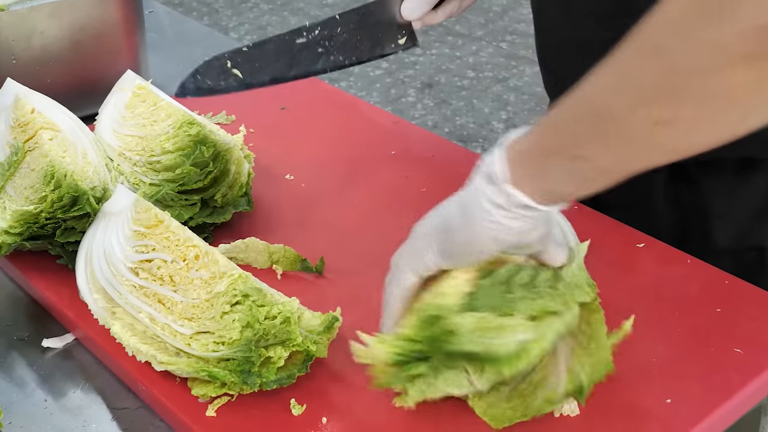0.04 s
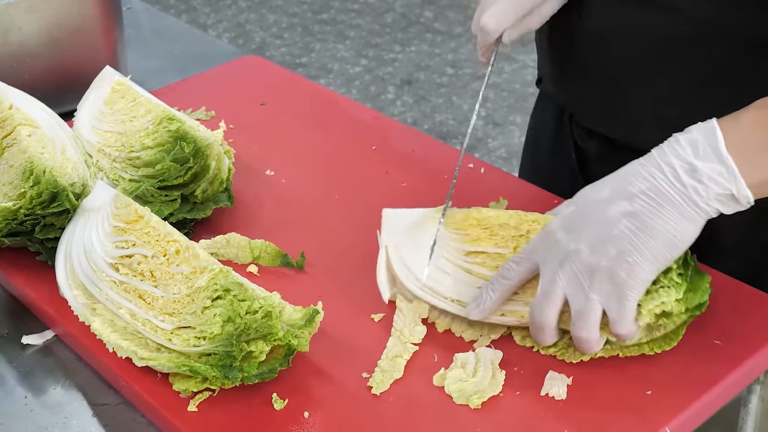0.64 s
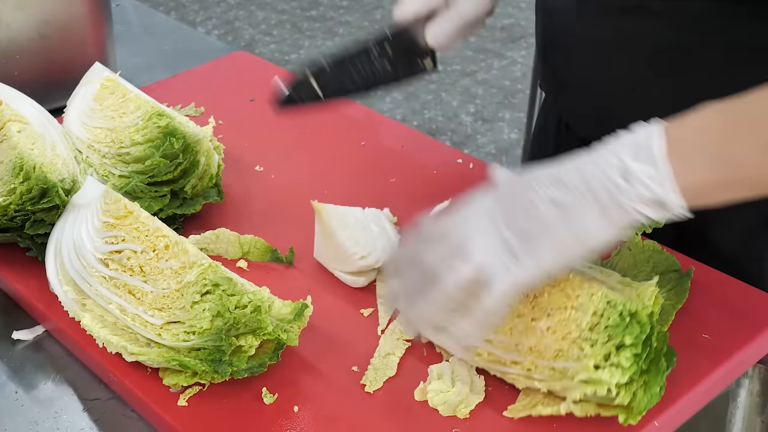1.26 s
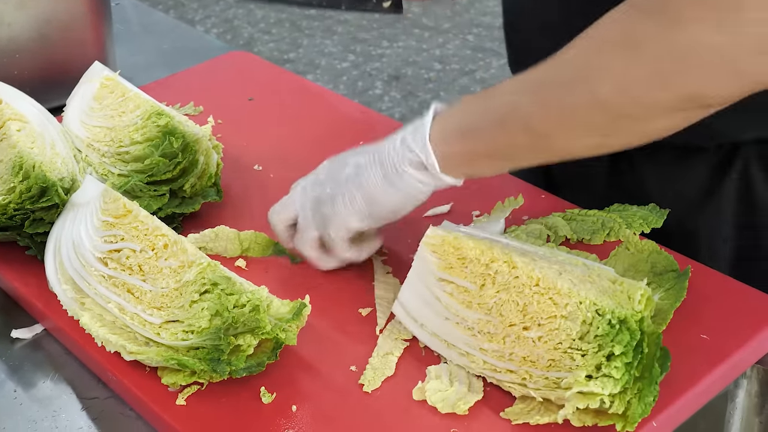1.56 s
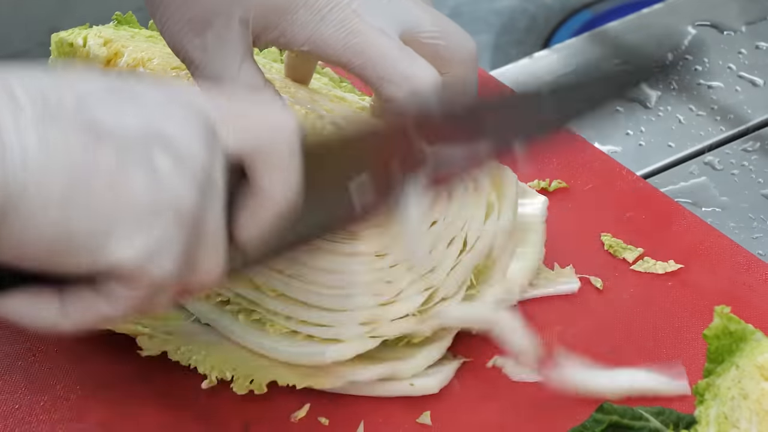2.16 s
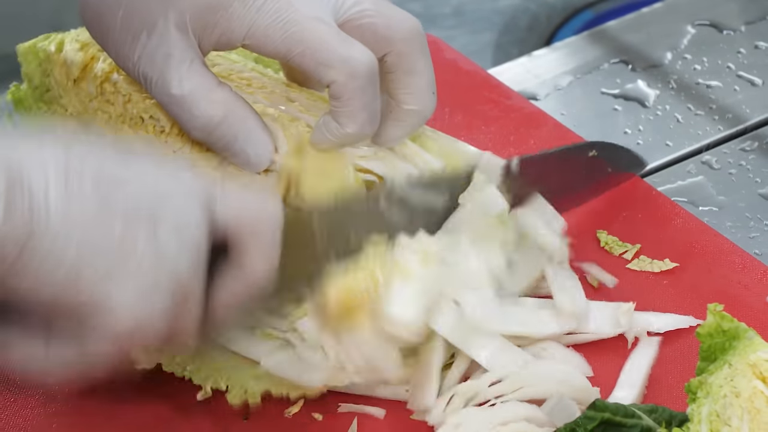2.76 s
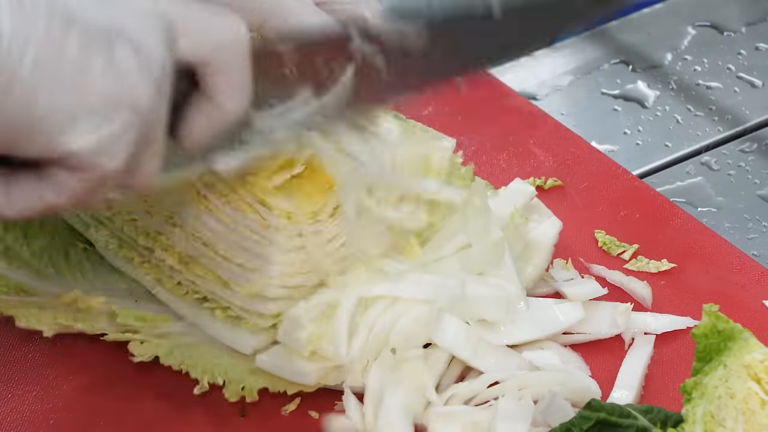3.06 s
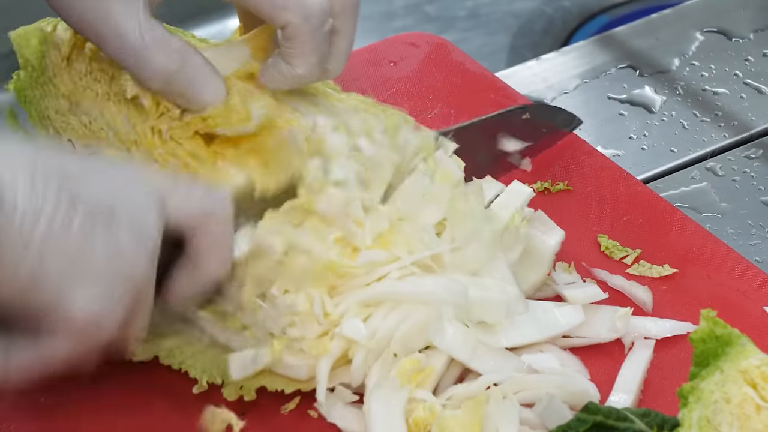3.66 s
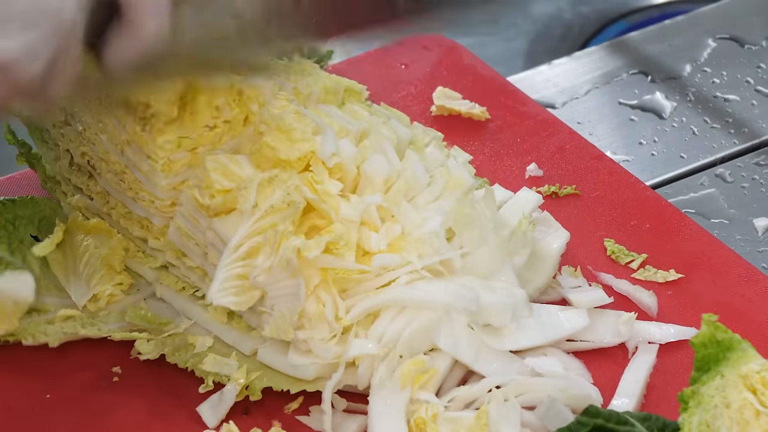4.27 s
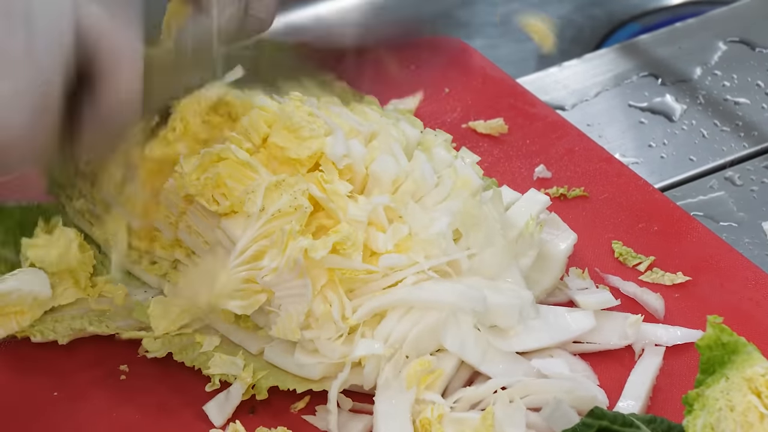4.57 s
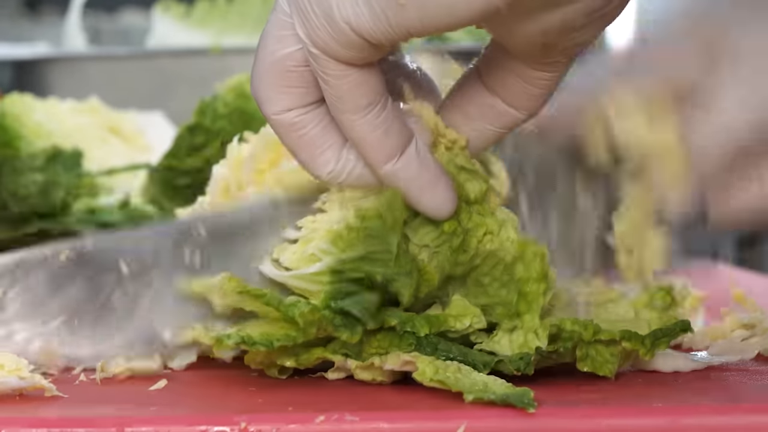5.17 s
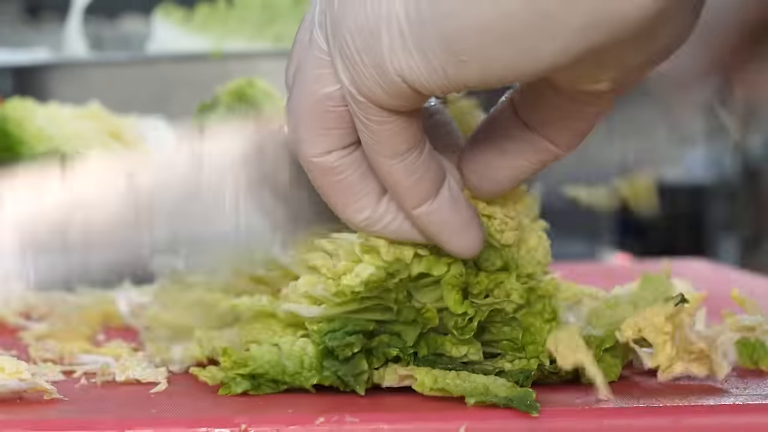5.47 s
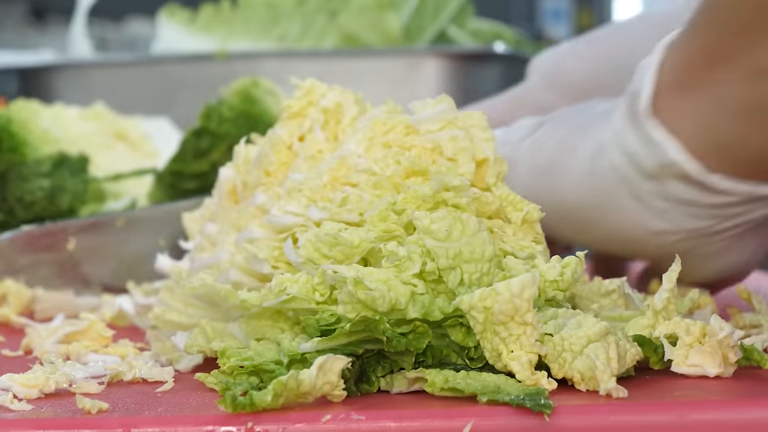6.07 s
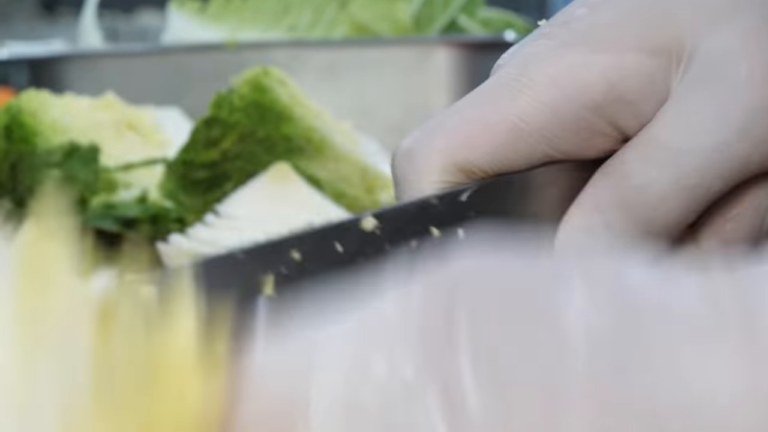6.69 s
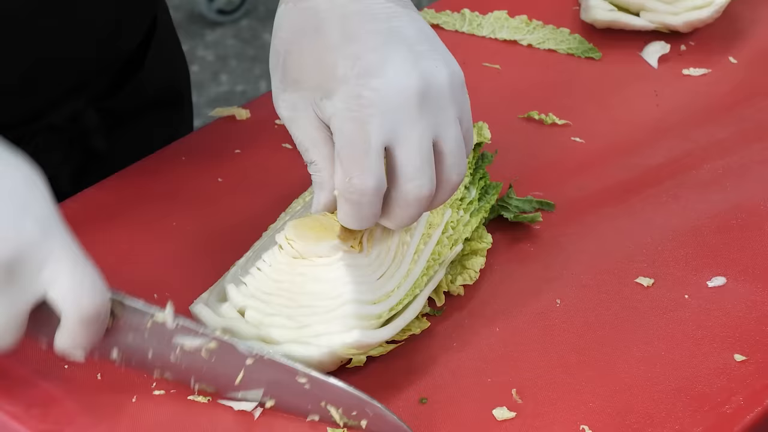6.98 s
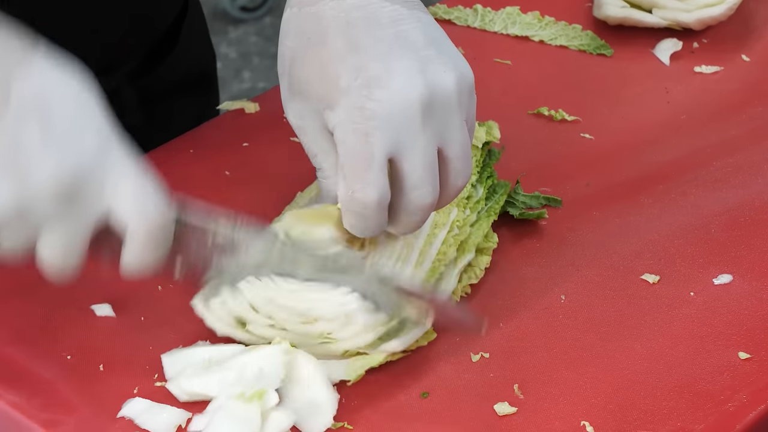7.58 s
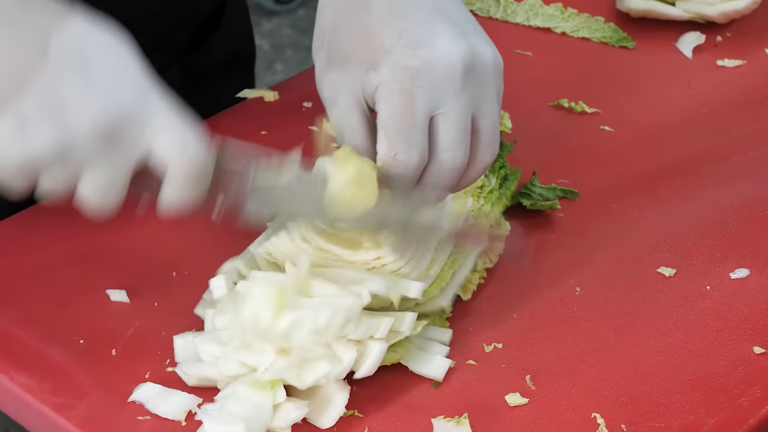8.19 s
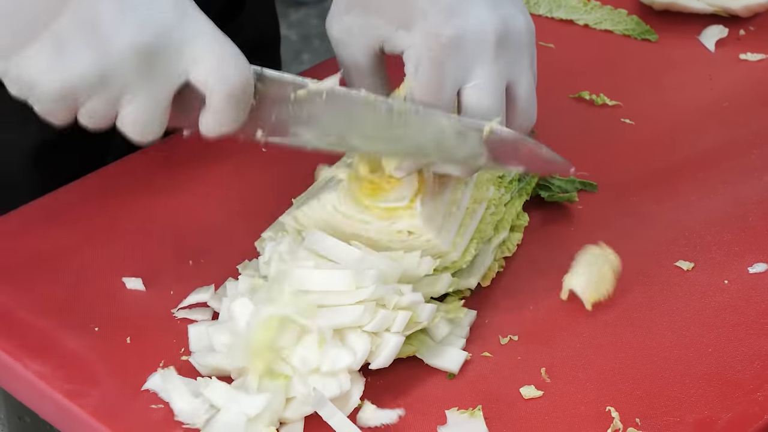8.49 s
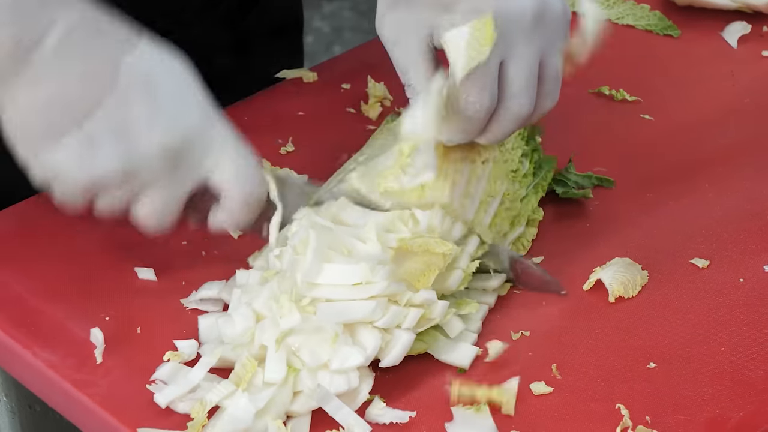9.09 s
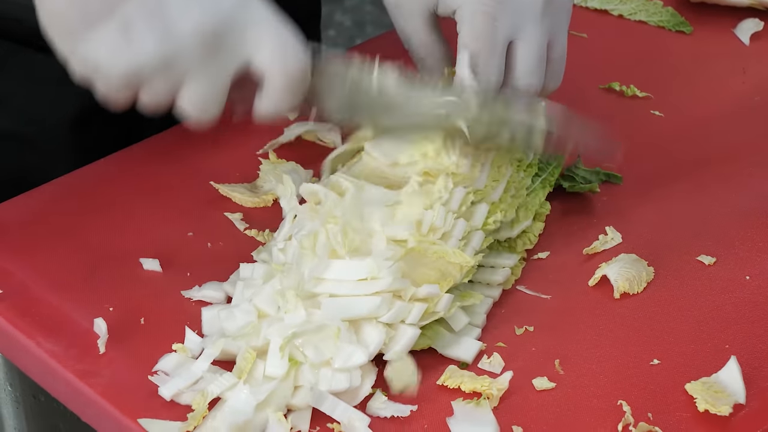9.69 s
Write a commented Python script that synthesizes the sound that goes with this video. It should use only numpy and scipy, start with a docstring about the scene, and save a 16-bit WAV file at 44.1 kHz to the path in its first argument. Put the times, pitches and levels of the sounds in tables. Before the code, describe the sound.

A big knife quickly chops cabbage on a plastic board, crisp crunches and dull knocks over a steady kitchen drone.

```python
"""A big knife shreds cabbage on a plastic board that lies on a steel table in a factory kitchen.
Each stroke crunches through the leaves as a swarm of tiny fractures and knocks on the damped board;
the table rings, the blade sings faintly and the hall answers. Leaves are handled and swept aside,
ribs snap and a wet glove rasps, over the kitchen's rumble, drone and hiss."""
import sys
import numpy as np
from scipy import signal
from scipy.fft import rfft, irfft
from scipy.io import wavfile

SR = 44100
rng = np.random.default_rng(int(sys.argv[2]) if len(sys.argv) > 2 else 0)


def to_wav(s):
    """Save 16-bit WAV."""
    ch = np.atleast_2d(s).T  # columns
    pcm = np.round(np.clip(ch, -1, 1) * 32767)  # PCM
    wavfile.write(sys.argv[1], SR, pcm.astype(np.int16))


N = 438354
TIME = np.arange(N) / SR
RUN_STOP_S = 0.012

# blade through leaves: breakthrough_s, before_s, after_s, ribs_db, leaf_db, burst_db
STROKES = [(0.59, 0.01, 0.015, -37.5, -33.5, -1), (0.93, 0.087, 0.059, -32.5, -32, 2),
           (2.088, 0.031, 0.027, -36.5, -32, 3), (2.302, 0.022, .036, -35.5, -28.5, 7),
           (2.512, 0.017, 0.061, -33.5, -26.5, 8), (2.762, 0.032, 0.015, -27.5, -19.5, 7),
           (3.001, 0.054, 0.028, -30, -25.5, 12), (3.22, .042, 0.018, -28.5, -23, 7),
           (3.431, 0.02, 0.054, -31.5, -27.5, 5), (3.656, 0.0067, 0.053, -29.5, -24.5, -9),
           (3.906, 0.015, 0.046, -26.5, -24, 2), (4.06, 0.0093, 0.044, -31.5, -33.5, -31),
           (4.15, .027, 0.05, -26, -25, 1), (4.405, 0.017, 0.05, -27, -24.5, 3),
           (4.647, 0.012, .05, -27, -25.5, 6), (4.887, 0.009, 0.062, -29.5, -26, 10.5),
           (5.143, 0.012, 0.041, -29.5, -26, 13), (5.392, 0.004, 0.037, -26.5, -24.5, -7),
           (5.63, 0.0021, .042, -35.5, -30, 6), (7.118, .005, 0.027, -34, -29.5, -3.5),
           (7.238, 0.022, .003, -35.5, -31, 11), (7.475, 0.028, 0.0018, -38.5, -28.5, 13),
           (7.701, 0.049, 0.0018, -34.5, -28.5, 11.5), (7.929, 0.038, .003, -33.5, -27.5, 7),
           (8.158, 0.033, 0.0043, -28, -24, 8), (8.392, 0.036, 0.0012, -30, -24.5, 5),
           (8.611, 0.0065, 0.032, -28.5, -24, 0), (8.878, 0.029, 0.0027, -26, -24.5, 5),
           (9.105, 0.039, 0.0014, -38, -35.5, 16), (9.318, 0.014, .002, -35.5, -36.5, 10),
           (9.563, 0.026, 0.0019, -27, -26.5, 2), (9.821, 0.044, .002, -30, -28, 5)]
# knocks on the board: start_s, knock_db, pitch_hz, thump_db, clack_db, crack_db, shake_db
# at 1.953 s and 7.042 s a soft, ringing tail starts abruptly
BLOWS = [(0.935, -14.5, 663, -27, -27, -30, 1.5), (1.953, -27, 630, -31, -30, -35, 0.5),
         (2.086, -2.5, 667, -19, -13.5, -12, 5), (2.301, -3, 665, -21, -14.5, -33, 5),
         (2.513, -3, 664, -18, -21, -32, 0), (2.764, -14, 783, -23.5, -28, -13, 6.5),
         (2.832, -4.5, 665, -18.5, -21, -23, -11), (3.004, -15, 770, -25.5, -25, -17, 8.5),
         (3.057, -4, 662, -18.5, -22, -22, -5), (3.223, -11.5, 743, -24, -17, -14.5, 10.5),
         (3.276, -5, 720, -23.5, -20, -24, 3.5), (3.432, -19, 708, -21, -20, -17, 0),
         (3.494, -3, 661, -19, -32, -26, 2.5), (3.655, -22.5, 790, -17, -16, -14.5, -2.5),
         (3.907, -15, 759, -19.5, -19, -21, 2), (4.035, -35, 636, -33, -50, -42, 3.5),
         (4.155, -11, 773, -19, -34, -23, 0), (4.291, -30, 700, -28.5, -52, -43, -9),
         (4.407, -10, 610, -17.5, -46, -15, 0.5), (4.465, -1.5, 687, -17, -18, -42, -11),
         (4.648, -11, 646, -18, -50, -30, 0.5), (4.824, -7.5, 698, -17.5, -47, -30, -15),
         (4.89, -6.5, 613, -14, -48, -25, -3.5), (5.047, -5, 695, -15.5, -44, -26, -14),
         (5.146, -5, 879, -26, -21, -15, 5), (5.39, -7, 900, -21.5, -17, -12, -1),
         (5.629, -3, 700, -20, -31, -11.5, -3.5), (7.042, -19, 764, -29.5, -25, -24, 8),
         (7.236, -2, 714, -23, -13, -17, 7.5), (7.475, -3.5, 717, -22, -13.5, -18, 0),
         (7.699, -3.5, 722, -20.5, -12.5, -18, -6), (7.93, -3, 730, -19, -18, -19, -2.5),
         (8.161, -4, 705, -21.5, -15, -22, 1), (8.392, -2.5, 725, -19.5, -16, -16, -4),
         (8.636, -4.5, 711, -20, -17.5, -13.5, -8), (8.876, -5.5, 712, -20, -20.5, -15, -6),
         (9.102, -1, 697, -18, -15, -15, -4), (9.319, -3, 698, -20, -16.5, -16.5, 2),
         (9.564, -3, 710, -19.5, -19, -18, -2), (9.822, -4.5, 703, -22, -19, -24, 6)]
# runs of chopping, with gains of the low, middle and high table modes: end_s, boom_db, hollow_db, ring_db
RUNS = [(1.9, -2, 0, -3), (5.07, -3, -0.5, -11), (7.0, -2.5, 5.5, 6), (10.2, -6, -10, -16)]


def from_db(db):
    return 10 ** (np.asarray(db) / 20)


def rms_one(x):
    return x / np.sqrt(np.mean(x ** 2) + 1e-20)


def at_hz(table, hz, column=1):
    """Table column interpolated over log frequency."""
    table = np.array(table)
    return np.interp(np.log(hz), np.log(table[:, 0]), table[:, column])


def gain_curve(table, column=1):
    """dB column as a gain over time, silent outside the table."""
    table = np.array(table)
    return from_db(np.interp(TIME, table[:, 0], table[:, column], left=-200, right=-200))


def butter(x, hz, kind, order=2):
    return signal.sosfilt(signal.butter(order, hz, kind, fs=SR, output="sos"), x)


def colour(x, spectrum):
    """Minimum-phase filter with the given spectrum."""
    hz = np.linspace(0, SR / 2, 2049)
    cepstrum = irfft(np.log(from_db(at_hz(spectrum, hz + 1))))
    fold = np.r_[1, np.full(len(hz) - 2, 2), 1, np.zeros(len(hz) - 2)]
    response = irfft(np.exp(rfft(cepstrum * fold)))
    return signal.fftconvolve(x, response)[:len(x)]


def add(out, start_s, sound):
    start = max(round(start_s * SR), 0)
    out[start:start + len(sound)] += sound[:N - start]


def modes(table, scatter_db, length_s, pitch_ratio=1):
    """One decaying sine per row, with random scatter in level."""
    hz, db, t60_s = np.array(table).T[:, :, None]
    t = TIME[:round(length_s * SR)]
    strength = from_db(db + scatter_db * rng.standard_normal(hz.shape))
    return strength * np.exp(-np.log(1000) * t / t60_s) * np.sin(2 * np.pi * hz * pitch_ratio * t)


def grains(per_s, spread_db):
    """Random tiny fractures, most weak, a few strong."""
    sizes = from_db(spread_db * np.minimum(rng.exponential(1, N), 4.5))
    return (rng.random(N) < per_s / SR) * sizes * rng.choice([-1, 1], N)


def flicker(per_s):
    """Random wander, unit RMS."""
    return rms_one(np.interp(TIME * per_s, np.arange(N), rng.standard_normal(N)))


def leaves(fractures, spectrum, coarse_gain, fine_gain, low_hz, patchy_db, flicker_per_s):
    """Bursting cells: coarse cracks below 4.5 kHz, fine above; each band's level flickers at random."""
    cells = butter(colour(fractures, spectrum), low_hz, "high")
    edges_hz = [700, 1500, 2100, 3000, 4500, 6500, 9500, 17000]
    bands = []
    for k, band_hz in enumerate(zip(edges_hz, edges_hz[1:])):
        band_gain = from_db(patchy_db * flicker(flicker_per_s))
        bands.append((-1) ** k * band_gain * butter(cells, band_hz, "band", order=3))
    return coarse_gain * rms_one(sum(bands[:4])) + fine_gain * rms_one(sum(bands[4:]))


def kitchen(rumble_gain_db, drone_gain_db, hiss_gain_db):
    """Background rumble, drone and hiss; from 1.97 s the drone swells with table rumble."""
    # background levels: time_s, rumble_db, drone_db, hiss_db
    levels = [(0.0, -46.5, -33, -45.5), (0.7, -48.5, -33.5, -46), (1.15, -44.5, -33, -42),
              (1.55, -45, -31.5, -39), (1.94, -46, -33, -38.5), (1.97, -49, -24, -46.5),
              (2.6, -47.5, -27.5, -44), (3.6, -43.5, -26.5, -42.5), (4.2, -48.5, -30.5, -42),
              (5.04, -45, -30, -63), (5.1, -45, -31, -45.5), (5.85, -45, -33.5, -51.5),
              (6.8, -43, -31, -47.5), (7.4, -48, -30, -38.5), (7.85, -49.5, -31.5, -49),
              (8.1, -48.5, -32.5, -45), (9.94, -48.5, -32.5, -46.5)]
    # background spectrum: freq_hz, level_db
    air = [(15, -49), (25, -24), (92, -4), (161, -2), (263, 3), (531, 2.5), (591, 1), (659, 2.5),
           (1190, -4), (2840, -20.5), (5000, -22.5), (8590, -27), (10700, -36), (14000, -41), (16000, -47)]
    low, middle, top = [colour(rng.standard_normal(N), air) for _ in range(3)]
    rumble = gain_curve(levels, 1) * rms_one(butter(low, 198, "low", order=4))
    drone = gain_curve(levels, 2) * rms_one(butter(middle, [220, 1600], "band", order=4))
    hiss = gain_curve(levels, 3) * rms_one(butter(top, 1720, "high", order=4))
    return from_db(rumble_gain_db) * rumble + from_db(drone_gain_db) * drone + from_db(hiss_gain_db) * hiss


def bumps(gain_db):
    """Soft, heavy contact moves only the table's lowest modes."""
    # cabbage and hand on the board: start_s, level_db
    contacts = [(0.009, -35), (0.998, -30), (1.188, -37), (1.51, -29), (2.599, -30), (3.582, -30),
                (6.756, -26), (6.817, -25)]
    # table frame modes: freq_hz, level_db, t60_s
    frame = [(76, -23, .16), (107, 2, 0.25), (144, 3, .12), (205, -5, 0.12)]
    out = np.zeros(N)
    for start_s, level_db in contacts:
        thud = modes(frame, scatter_db=1.5, length_s=0.3).sum(0)
        add(out, start_s, from_db(level_db + gain_db) * thud / np.abs(thud).max())
    return out


def snaps(gain_db, decay_s):
    """A leaf rib breaks in one short bright burst."""
    # single breaks: start_s, level_db
    breaks = [(0.0295, -25), (0.351, -29), (0.646, -29), (0.772, -23), (0.975, -18), (1.964, -25),
              (2.67, -27), (4.2594, -23), (5.598, -29), (5.7094, -45), (6.768, -26), (6.891, -28),
              (8.5622, -19), (9.5123, -27)]
    out, t = np.zeros(N), TIME[:SR // 40]
    for start_s, level_db in breaks:
        noise = rng.standard_normal(len(t)) * np.exp(-t / decay_s)
        burst = butter(noise, [2000, 10000], "band", order=1)
        add(out, start_s, from_db(level_db + gain_db) * burst / np.abs(burst).max())
    return out


def sweeps(rub_gain_db, rustle_gain_db, fade_db):
    """Leaves and gloves slide over the board; level follows hand speed."""
    # hand moves: fastest_s, rise_s, fall_s, rub_db, rustle_db
    moves = [(0.034, 0.046, 0.15, -42.5, -47), (0.204, 0.056, 0.1, -33, -41),
             (4.815, 0.059, 0.063, -39, -40), (5.055, 0.053, .02, -34, -39.5), (6.05, .12, 0.1, -44.5, -51),
             (6.28, 0.049, 0.11, -37, -46), (6.552, .23, 0.27, -29, -36.5),
             (6.775, 0.017, 0.06, -30.5, -37), (6.85, 0.055, 0.082, -33.5, -38.5),
             (7.36, 0.35, 0.11, -55, -46), (8.72, 0.24, 0.055, -48, -44)]
    # sliding spectrum: freq_hz, level_db
    spectrum = [(710, -26), (1200, 10.5), (1340, 1), (1520, 7), (1660, 1), (1950, 3.5), (3250, 2.5),
                (8720, -6.5), (10800, -10), (14200, -13), (16000, -23)]
    power = np.zeros((2, N))
    for fastest_s, rise_s, fall_s, rub_db, rustle_db in moves:
        away = np.clip(np.maximum((fastest_s - TIME) / rise_s, (TIME - fastest_s) / fall_s), 0, 10)
        peaks = from_db([rub_db + rub_gain_db, rustle_db + rustle_gain_db])
        power += np.outer(peaks, from_db(-fade_db * away ** 1.6)) ** 2
    rub, rustle = np.sqrt(power)
    fractures = grains(per_s=7400, spread_db=2.0)
    return leaves(fractures, spectrum, rub, rustle, low_hz=1300, patchy_db=2.0, flicker_per_s=68)


def crunch(ribs_gain_db, leaf_gain_db):
    """The blade bites in, breaks through, stops. Leaf tears first, ribs deeper: the crunch darkens."""
    # cutting spectrum: freq_hz, level_db
    spectrum = [(530, -32), (900, 6.5), (1020, 1), (1340, 6), (2090, 3), (2300, 4.5), (3040, 5.5),
                (4920, -0.5), (5610, -3.5), (8350, -1.5), (10600, -9), (12700, -7.5), (14400, -6),
                (15400, -14), (16000, -18)]
    entry_db, exit_db = (3.5, 1.1), (0.5, 4)   # drop at each end of the cut: (ribs, leaf)
    bite_db_per_s, stop_db_per_s = 1200, 950
    burst_s, leaf_burst_share = 0.0052, 0.32
    power = np.zeros((2, N))
    for breakthrough_s, before_s, after_s, ribs_db, leaf_db, burst_db in STROKES:
        near = np.abs(TIME - breakthrough_s) < 0.15
        t = TIME[near] - breakthrough_s
        onset_db = np.outer(entry_db, np.clip(-t / before_s, 0, 1))
        onset_db += bite_db_per_s * np.maximum(-t - before_s, 0)
        release_db = np.outer(exit_db, np.clip(t / after_s, 0, 1))
        release_db += stop_db_per_s * np.maximum(t - after_s, 0)
        break_db = burst_db * np.exp(-np.abs(t) / burst_s)
        cut_db = np.array([ribs_db + ribs_gain_db + break_db,
                           leaf_db + leaf_gain_db + leaf_burst_share * break_db])
        power[:, near] += from_db(cut_db - onset_db - release_db) ** 2
    ribs, leaf = np.sqrt(power)
    fractures = grains(per_s=6000, spread_db=3.0)
    return leaves(fractures, spectrum, ribs, leaf, low_hz=900, patchy_db=2.5, flicker_per_s=130)


def blade(cuts, scrape_gain_db, cut_gain_db):
    """The steel sings when scraped, and faintly whenever it cuts."""
    # blade modes: freq_hz, level_db, t60_s
    steel = [(2720, -2, 0.041), (3330, -9, .04), (4025, 0, 0.16), (4550, -3, 0.036), (5860, -2, .08),
             (6560, -13, 0.12), (8100, -9, .05), (8800, -5.5, 0.098), (9510, -3, 0.039), (9950, 1, 0.05),
             (11500, -15, 0.075), (12800, -12, .12), (14200, -15, .06), (15436, -16, .1)]
    # blade's flat scraping the board: time_s, level_db
    scrape = [(7.04, -51), (7.11, -40), (7.135, -30), (7.155, -34), (7.18, -60)]
    response = modes(steel, scatter_db=0.5, length_s=0.35).sum(0)
    friction = gain_curve(scrape) * rms_one(grains(per_s=9700, spread_db=2.6))
    drive = from_db(scrape_gain_db) * friction + from_db(cut_gain_db) * butter(cuts, 9600, "high")
    return signal.fftconvolve(drive, response / np.linalg.norm(response))[:N]


def scraps(chance, min_peak_db):
    """A loose shred lands with a faint wet tick after most strokes."""
    out, t = np.zeros(N), TIME[:SR // 100]
    draws = rng.random((len(STROKES), 4))
    for (stroke_s, *_), (luck, delay, size, pitch) in zip(STROKES, draws):
        noise = rng.standard_normal(len(t)) * np.exp(-t / 0.0014)
        tick = butter(noise, [2200 + 2500 * pitch, 11000], "band", order=1)
        if luck < chance:
            peak = from_db(min_peak_db + 11 * size)
            add(out, stroke_s + 0.07 + 0.1 * delay, peak * tick / np.abs(tick).max())
    return out


def board_knock(pitch_hz, thump_db, knock_db, clack_db, crack_db):
    """The plastic gives way and rounds the knock; pitch depends on strike point and load."""
    # damped board modes at the reference pitch: freq_hz, level_db, t60_s
    plastic = [(206, -4, 0.019), (263, -1, 0.023), (343, 3, 0.026), (523.2, -11, 0.09), (663, 3.5, 0.014),
               (754, 3, 0.022), (873, 11, 0.0087), (1222, -0.5, 0.02), (1403, 8, 0.022), (1490, -7, 0.041),
               (1718, -5, 0.027), (1965, -5, 0.023), (2165, 7.5, 0.0083), (2810, -0.5, 0.0078),
               (3110, -6.5, 0.009), (3480, 8, 0.0038)]
    reference_hz, contact_hz, landing_s = 725, 1760, 0.0017
    pitch_ratio = pitch_hz / reference_hz
    ringing = modes(plastic, scatter_db=1.0, length_s=0.06, pitch_ratio=pitch_ratio)
    ringing *= 1 - np.exp(-TIME[:ringing.shape[1]] / landing_s)   # the edge lands along its length
    register = np.digitize(np.array(plastic)[:, 0] * pitch_ratio, [550, 1120, 1650])
    low, middle, high, top = [rms_one(ringing[register == k].sum(0)) for k in range(4)]
    body = from_db(thump_db) * low + from_db(knock_db) * middle - from_db(clack_db) * high
    crack = from_db(crack_db) * butter(top, 2050, "high")   # hard edge contact
    return butter(body, contact_hz, "low", order=7) + crack


def table_ring(start_s, push_db):
    """The steel table rings under a blow; at set moments (1.9, 5.07 and 7.0 s) the ring stops short."""
    # table modes: freq_hz, level_db, t60_s
    steel = [(175.4, -7, 0.46), (207.7, 0, 1), (235, -10.5, 0.64), (277.4, 1.5, 0.32), (311.4, -2.5, 1),
             (363.6, 0.5, 0.33), (387.7, 3, 0.71), (442.6, 0.5, 0.13), (505.7, 0.5, 0.32),
             (542.3, -3.5, 0.53), (602, -8.5, 0.69), (687, 0, 0.35), (768, -3.5, 0.76), (837, -5, 0.32)]
    end_s, *run_db = next(run for run in RUNS if start_s < run[0])
    register_db = np.array(run_db) + [-4.5, 0.5, 0.5]   # low, middle, high
    register = np.digitize(np.array(steel)[:, 0], [420, 650])
    strengths = from_db(push_db + register_db[register]) * (-1) ** np.arange(len(steel))
    ring = strengths @ modes(steel, scatter_db=2.5, length_s=0.6)
    return ring * np.clip((end_s - start_s - TIME[:len(ring)]) / RUN_STOP_S, 0, 1)


def chopping(cushion, low_hz):
    """Knocks on the board shake the table; returns direct sound and hall send."""
    board, table = np.zeros(N), np.zeros(N)
    for start_s, knock_db, pitch_hz, thump_db, clack_db, crack_db, shake_db in BLOWS:
        knock = board_knock(pitch_hz, thump_db - 7.5, knock_db - 17.5, clack_db - 14, crack_db - 14)
        add(board, start_s, knock)
        # a blow cushioned by leaves pushes longer and drives the table harder
        push_db = shake_db + thump_db + cushion * (thump_db - knock_db)
        add(table, start_s, table_ring(start_s, push_db))
    # high-pass thins the bass of the knocks and the table ring
    return butter(board + table, low_hz, "high", order=3), butter(board, low_hz, "high")


def pops(t60_s):
    """A thick rib gives way at once and rings briefly."""
    # thick ribs: start_s, level_db, pitch_hz
    ribs = [(2.762, -19, 2520), (3.222, -7, 3120), (3.431, -11.5, 3200), (3.655, -22, 3010),
            (5.629, -11.5, 3300), (9.512, -25, 3050)]
    out = np.zeros(N)
    for start_s, level_db, pitch_hz in ribs:
        add(out, start_s, modes([(pitch_hz, level_db, t60_s)], scatter_db=0, length_s=0.04)[0])
    return out


def glove():
    """A wet glove rasps on the board: sparse grains in a narrow band."""
    # rasp envelope: time_s, level_db
    rasp = [(6.235, -55.5), (6.26, -34.5), (6.3, -38), (6.34, -45), (6.4, -60)]
    friction = butter(grains(per_s=885, spread_db=1.6), [1850, 2500], "band")
    return gain_curve(rasp) * rms_one(friction)


def hall(x, build_s):
    """Diffuse echoes build and decay in half-octave bands."""
    # hall response: freq_hz, level_db, t60_s
    reverb = [(100, -4, 0.79), (208, -7, 1), (433, 0, 1), (725, -15, 1), (1030, -2.5, 0.36),
              (1580, -15, 0.78), (3460, -17.5, 0.63), (8000, -14, 0.48), (15000, -20, 0.77)]
    t, response = TIME[:SR], 0
    edges_hz = 70 * 2 ** np.arange(0, 8.1, 0.5)
    for low_hz, high_hz in zip(edges_hz, edges_hz[1:]):
        centre_hz = np.sqrt(low_hz * high_hz)
        t60_s = at_hz(reverb, centre_hz, column=2)
        fade = np.exp(-np.log(1000) * t / t60_s) * (1 - np.exp(-t / build_s))
        noise = butter(rng.standard_normal(len(t)), [low_hz, high_hz], "band")
        response += from_db(at_hz(reverb, centre_hz)) * noise * fade / np.linalg.norm(fade)
    return signal.fftconvolve(x, response)[:N]


def echo_gate():
    """At set moments (1.9, 5.07 and 7.0 s) the echoes stop short and return with the next knock."""
    gate = np.ones(N)
    for end_s, *_ in RUNS[:-1]:
        resume_s = min(start_s for start_s, *_ in BLOWS if start_s > end_s)
        gate *= np.clip(np.maximum(end_s - TIME, TIME - resume_s) / RUN_STOP_S, 0, 1)
    return gate


def spread(mid, side_gain_db):
    """Scattered early reflections differ slightly between left and right."""
    # side signal spectrum: freq_hz, level_db
    width = [(60, -27), (110, -21), (200, -47), (380, -35), (700, -47), (1290, -34), (2380, -21),
             (4400, -18.5), (8120, -15.5), (15000, -12)]
    t = TIME[:SR // 60]
    scatter = rng.standard_normal(len(t)) * np.exp(-t / 0.0058)
    reflections = signal.fftconvolve(mid, scatter / np.linalg.norm(scatter))[:N]
    side = from_db(side_gain_db) * colour(reflections, width)
    return np.array([mid + side, mid - side])


def scene():
    """Knife, cabbage and board close by, in the hall, over the kitchen's background."""
    blows, hall_send = chopping(cushion=0.51, low_hz=150)
    cuts = crunch(ribs_gain_db=1.5, leaf_gain_db=-2.02)
    cabbage = cuts + sweeps(rub_gain_db=-3.5, rustle_gain_db=1.0, fade_db=11.5) + glove()
    cabbage += scraps(chance=0.9, min_peak_db=-35)
    cabbage += pops(t60_s=0.017) + snaps(gain_db=0.5, decay_s=0.001)
    steel = blade(cuts, scrape_gain_db=1.5, cut_gain_db=-8.5)
    echoes = echo_gate() * hall(hall_send + cabbage, build_s=0.00069)
    background = kitchen(rumble_gain_db=4.0, drone_gain_db=-4.5, hiss_gain_db=-0.5)
    mid = blows + cabbage + steel + bumps(gain_db=1.0) + echoes + background
    return spread(mid, side_gain_db=-9.0)


def record(dry):
    """Soft limiter, 25 Hz high-pass, steep low-pass."""
    ceiling, stopband_hz = 0.95, 16700
    rounded = dry / (1 + (dry / ceiling) ** 4) ** 0.25
    low_pass = signal.cheby2(16, 70, stopband_hz, fs=SR, output="sos")
    return signal.sosfilt(low_pass, butter(rounded, 25, "high"))


dry = scene()
out = record(dry)
to_wav(out)
```